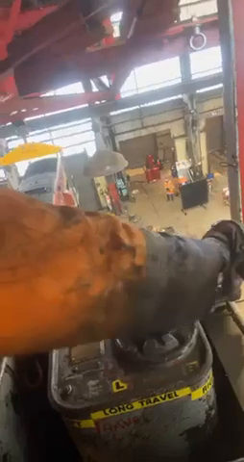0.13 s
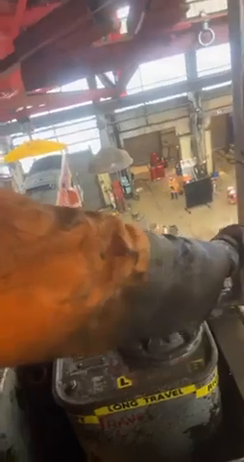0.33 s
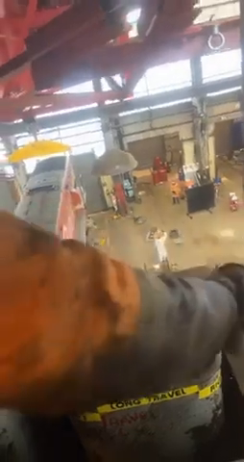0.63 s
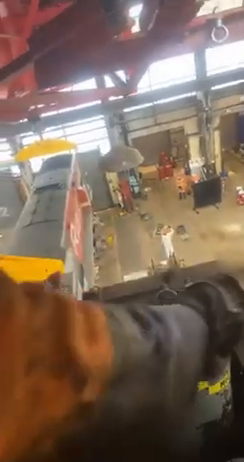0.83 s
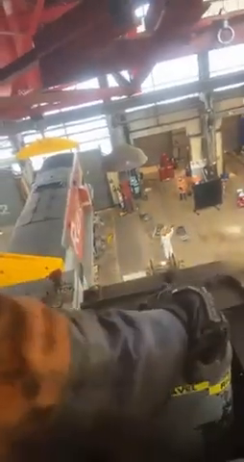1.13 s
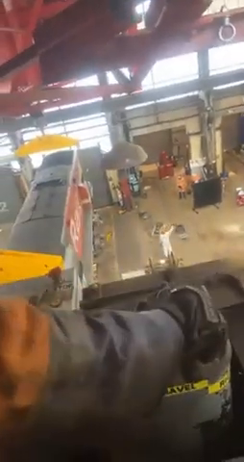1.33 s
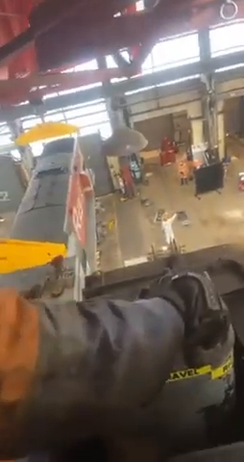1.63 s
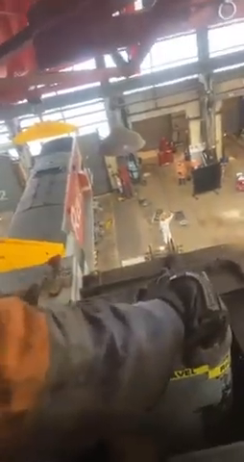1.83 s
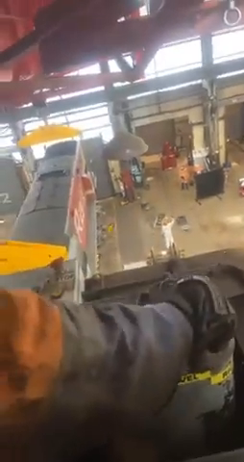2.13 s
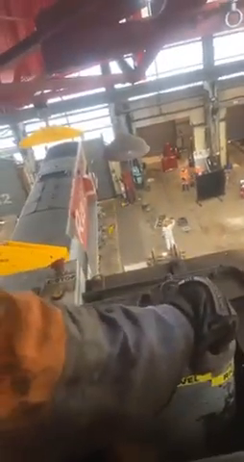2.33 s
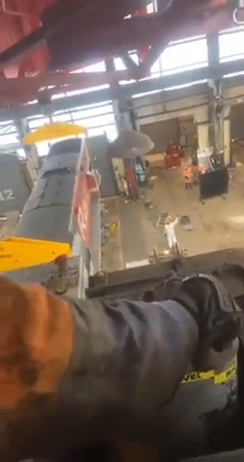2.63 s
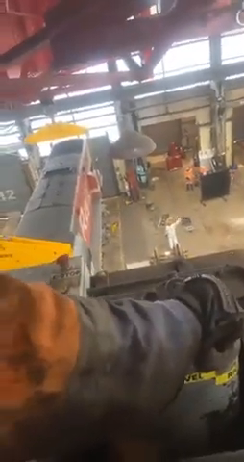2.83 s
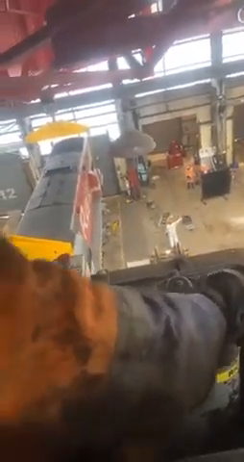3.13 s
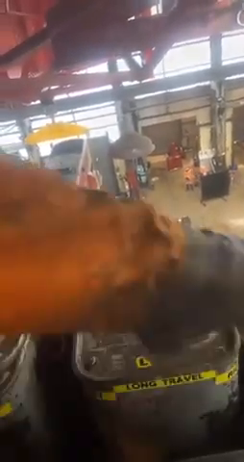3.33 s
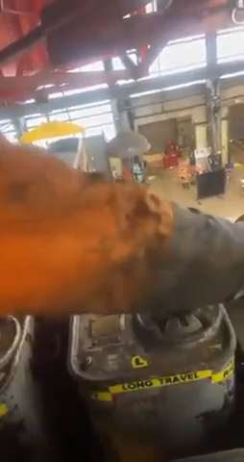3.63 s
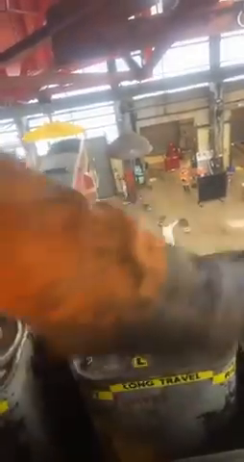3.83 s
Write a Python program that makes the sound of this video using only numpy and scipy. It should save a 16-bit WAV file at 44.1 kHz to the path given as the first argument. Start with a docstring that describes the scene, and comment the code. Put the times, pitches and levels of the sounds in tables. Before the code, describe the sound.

Overhead crane rumbles along its rails in a big workshop, controller clacking sharply through notches

```python
"""An overhead crane heard from its cab in a big steel workshop. Noise bands rumble, growl and hiss for the
wheels on the rails, and a wavering sine drones for the cab. The driver swings the travel controller through
notches that clack in modes and noise bursts; bumps, ticks and knocks fall between, and the hall answers the
controller. The noise sinks as the crane slows and a resonance whines. On the way back the controller shaft
groans in harmonics, it snaps into a notch and the drive picks up again."""
import sys
import numpy as np
from scipy import signal
from scipy.fft import rfft, irfft, next_fast_len
from scipy.io import wavfile
from scipy.ndimage import map_coordinates

SR = 44100
rng = np.random.default_rng(int(sys.argv[2]) if len(sys.argv) > 2 else 0)


def file_out(sig):
    """Save sig as 16-bit WAV at sys.argv[1]."""
    # one column per channel
    cols = np.atleast_2d(sig).T
    # limit, then scale
    lim = np.clip(cols, -1, 1)
    pcm = np.round(lim * 32767).astype(np.int16)
    wavfile.write(sys.argv[1], SR, pcm)


N = 176400


def amp(db):
    """Decibels to gain."""
    return 10 ** (np.asarray(db) / 20)


def unit(x):
    """Scale to rms 1."""
    return x / np.sqrt(np.mean(x ** 2) + 1e-20)


def along(points, hz):
    """Interpolate (Hz, value) points on a log frequency axis."""
    point_hz, values = np.transpose(points)
    return np.interp(np.log(hz + 1), np.log(point_hz + 1), values)


def curves(rows):
    """One value per sample for each column after the time."""
    times_s, *columns = np.transpose(rows)
    return [np.interp(np.arange(N) / SR, times_s, column) for column in columns]


def since(start_s):
    """Seconds elapsed after start_s, zero before."""
    return np.maximum(np.arange(N) / SR - start_s, 0)


def wobble(rate):
    """A smooth random curve, rate knots a second."""
    return map_coordinates(rng.standard_normal(8192), [np.arange(N) * rate / SR], mode="wrap")


def filtered(x, response):
    """Multiply the spectrum of x by a response of frequency."""
    m = next_fast_len(N + SR // 2)
    return irfft(rfft(x, m) * response(np.fft.rfftfreq(m, 1 / SR)), m)[:N]


def noise(spectrum):
    """Coloured noise of rms 1."""
    return unit(filtered(rng.standard_normal(N), lambda hz: amp(along(spectrum, hz))))


def band(centre_hz, half_width_hz):
    """Noise of rms 1 in one resonance, gain halved at half_width_hz off centre."""
    return unit(filtered(rng.standard_normal(N), lambda hz: 1 / (1 + ((hz - centre_hz) / half_width_hz) ** 2)))


def tone(hz):
    """A sine of rms 1 on a pitch curve."""
    return np.sqrt(2) * np.sin(2 * np.pi * np.cumsum(hz) / SR)


def envelope(t, attack_s, hold_s, t60_s):
    """Exponential attack; after the hold, a release of 60 dB per t60."""
    return (1 - np.exp(-t / attack_s)) * amp(-60 * np.maximum(t - hold_s, 0) / t60_s)


def travel():
    """The bridge rumbles, the wheels growl and hiss on the rails, a cab panel drones along."""
    # Levels of rumble, growl and hiss. Each row: time in seconds, level in dB.
    rumble_level = [(0, -26), (.13, -22.5), (.46, -23.5), (.75, -19), (1.31, -27.5), (1.6, -28.5),
                    (2.13, -31.5), (2.42, -33.5), (3.13, -37.5), (3.45, -33), (3.64, -26.5), (3.75, -36),
                    (4, -21.5)]
    growl_level = [(0, -23.5), (.25, -25.5), (.4, -23), (.6, -22), (.72, -23.5), (.82, -23), (1.07, -25),
                   (1.2, -26), (1.36, -31), (1.52, -30.5), (1.6, -34.5), (1.66, -30), (1.85, -35.5),
                   (1.94, -30.5), (2.03, -34.5), (2.17, -37.5), (2.28, -34.5), (2.37, -37.5), (2.45, -36),
                   (2.58, -39), (3.1, -39), (3.21, -33), (3.45, -34.5), (3.56, -25.5), (3.68, -34),
                   (3.78, -23.5), (3.84, -29.5), (3.96, -23), (4, -24)]
    hiss_level = [(0, -48.5), (.13, -42.5), (.3, -47), (.52, -39.5), (.61, -48.5), (.7, -42), (.82, -44),
                  (1.04, -50.5), (1.16, -48), (1.22, -53), (1.29, -48), (1.38, -53), (1.49, -50),
                  (1.6, -58), (1.72, -50), (1.92, -60.5), (2.06, -54), (2.14, -60.5), (2.29, -60),
                  (2.4, -63.5), (2.8, -62.5), (3.48, -61.5), (3.62, -47), (3.69, -51), (3.87, -55),
                  (3.95, -42.5), (4, -51)]
    # Cab drone. Each row: time in seconds, pitch in Hz, level in dB.
    drone_course = [(0, 205, -28), (.04, 199, -17.5), (.13, 197, -17), (.19, 192, -25.5), (.3, 195, -24.5),
                    (.37, 202, -17.5), (.42, 213, -20.5), (.48, 197, -22), (.53, 194, -14.5),
                    (.58, 197, -30.5), (.64, 208, -23.5), (.72, 200, -26), (1.0, 203, -28),
                    (1.35, 197.2, -35.5), (2.3, 200.8, -40), (3, 200, -63), (3.8, 200, -39.5),
                    (4, 200, -30)]
    # Spectra of rumble, growl and hiss. Each row: frequency in Hz, relative density in dB per Hz.
    rumble_spectrum = [(20, -16.5), (32, -13.5), (45, -6.5), (65, 1), (80, -4), (105, -0.5), (135, -4.5),
                       (180, -12), (300, -45.5), (600, -86)]
    growl_spectrum = [(60, -37.5), (130, -9), (175, 2), (205, -1.5), (225, 1.5), (280, -1), (310, -4.5),
                      (360, -7.5), (400, -10), (440, -8.5), (520, -14), (680, -17.5), (850, -22.5),
                      (1100, -26.5), (1600, -29.5), (2300, -35.5), (3500, -54), (6000, -100)]
    hiss_spectrum = [(700, -4), (1600, -4), (2600, 2.5), (4200, 3.5), (6500, 0), (8200, -4.5),
                     (9300, -27.5)]

    rumble_db, = curves(rumble_level)
    growl_db, = curves(growl_level)
    hiss_db, = curves(hiss_level)
    drone_hz, drone_db = curves(drone_course)
    rumble = amp(rumble_db + 0.72 * wobble(14)) * noise(rumble_spectrum)
    growl = amp(growl_db + 1.1 * wobble(30.23)) * noise(growl_spectrum)
    hiss = amp(hiss_db + 0.8 * wobble(25)) * noise(hiss_spectrum)
    wavering_hz = drone_hz * (1 + 0.02 * wobble(45))
    drone = amp(drone_db + 1.4 * wobble(38)) * tone(wavering_hz)
    return rumble + growl + hiss + drone


def thump(t):
    """The controller's stand rocks in one low mode."""
    mode_hz, rise_s, hold_s, t60_s = 252.3, 0.0032, 0.0079, 0.12
    return envelope(t, rise_s, hold_s, t60_s) * np.sin(2 * np.pi * mode_hz * t)


def clacks():
    """Each clack: a crack of the contacts, the ring of the steel case, a thump of its stand, a brief rattle."""
    # Controller clacks, with second contacts and rebounds. Each row: start in seconds, level in dB,
    # attack in seconds, then relative levels of thump, ring and crack in dB.
    strikes = [(.330, -16, 0.00042, 0.5, -1, -1), (0.341, -25, 0.00046, -16, 1.5, -6),
               (0.423, -25.5, 0.0058, 5.5, -1, 4.5), (0.924, -21, 0.0094, -9.5, 0, -2.5),
               (1.095, -27, 0.016, 4.5, 2.5, -0.5), (3.708, -13, 0.00023, 4, 2.5, -1),
               (3.759, -29.5, 0.009, 12, -10, 2)]
    # Case modes. Each row: frequency in Hz, relative level in dB, t60 in seconds.
    case_modes = [(359, -0.5, 0.16), (419, -3.5, 0.095), (605, -7.5, 0.18), (796, -6, 0.084),
                  (940, -8.5, 0.17), (1000, -7.5, 0.26), (1132, -1.5, 0.12), (1371, -1, 0.13),
                  (1520, -3.5, 0.1), (1580, 2.5, 0.105), (1667, 0.5, 0.1), (1875, -8.5, 0.12),
                  (3056, -15, 0.11), (3500, -7, 0.088), (3650, -4, 0.085), (3990, -7.5, 0.14),
                  (4580, -11.5, 0.091), (5310, 1, 0.039), (6000, -11.5, .09), (6480, -16, 0.12),
                  (7000, -6.5, 0.058)]
    # Contact crack and loose-part rattle. Each row: frequency in Hz, relative density in dB per Hz.
    crack_spectrum = [(300, -8), (900, -10), (1700, 1), (2300, -12.5), (3000, -2.5), (4000, -1), (5500, -2),
                      (7000, -5), (8500, -12), (9500, -25.5)]
    rattle_spectrum = [(150, -14.5), (250, 14.5), (400, 10.5), (600, -6), (1050, 0.5), (1700, -2.5),
                       (2300, -19.5), (4000, -17), (9000, -45)]
    crack_hold_s, crack_t60_s = 0.0036, 0.097
    rattle_db, rattle_attack_s, rattle_hold_s, rattle_t60_s = -15.5, 0.008, 0.051, 0.14

    out = np.zeros(N + SR)
    t = np.arange(SR // 2) / SR
    for start_s, db, attack_s, thump_db, ring_db, crack_db in strikes:
        ring = np.zeros(len(t))
        for hz, mode_db, t60_s in case_modes:
            mode_gain = amp(mode_db + rng.normal(0, 1.0))  # every strike excites the modes a little differently
            mode = np.sin(2 * np.pi * (hz * t + rng.random()))
            ring += mode_gain * envelope(t, attack_s, 0, t60_s) * mode
        crack = envelope(t, attack_s, crack_hold_s, crack_t60_s) * noise(crack_spectrum)[:len(t)]
        rattle = envelope(t, rattle_attack_s, rattle_hold_s, rattle_t60_s) * noise(rattle_spectrum)[:len(t)]
        clack = amp(rattle_db) * rattle
        clack += 1.2 * amp(thump_db) * thump(t)
        clack += 0.38 * amp(ring_db) * ring
        clack += 0.74 * amp(crack_db) * crack
        out[round(start_s * SR):][:len(t)] += amp(db) * clack
    return out[:N]


def wheels():
    """A low swell of the drone, then dull wheel bumps, all wavering sines; the gears whine while coasting."""
    # Wheel bumps, and first a low swell of the drone near 280 Hz.
    # Each row: start in seconds, pitch in Hz, level in dB, t60 in seconds.
    low_tones = [(.385, 279.5, -20, 0.51), (.7, 113, -14.5, 0.21), (1.641, 200.2, -16, 0.12),
                 (1.68, 85.25, -22.5, 0.36), (2.264, 204.2, -26, 0.33), (2.43, 85, -21, 0.14),
                 (2.73, 93.6, -29, 0.16), (3.466, 114.4, -24, 0.21)]
    # Gear whine. Each row: time in seconds, level in dB.
    whine_level = [(1.2, -76), (1.45, -43), (1.7, -45), (1.85, -51), (2.0, -43), (2.15, -48.5), (2.5, -57),
                   (3.06, -60), (3.15, -45.5), (3.3, -60)]

    bumps = np.zeros(N)
    for start_s, hz, db, t60_s in low_tones:
        wavering_hz = hz * (1 + 0.09 * wobble(90))
        bumps += amp(db) * envelope(since(start_s), 0.0056, 0, t60_s) * tone(wavering_hz)
    whine_db, = curves(whine_level)
    whine = amp(whine_db) * band(centre_hz=446, half_width_hz=19)
    return whine + bumps


def ticks():
    """Loose linkage parts sound in noise bursts, one resonance each, from short ticks to a long faint squeal."""
    # Each row: start in seconds, pitch in Hz, half width in Hz, level in dB, attack in seconds, t60 in seconds.
    bursts = [(.43, 1490, 220, -29, .004, 0.14), (0.664, 2110, 310, -33.5, .012, .22),
              (.912, 7530, 400, -31.5, 0.0053, 0.094), (1.07, 2250, 550, -38, .02, 0.51),
              (2.235, 2250, 300.7, -51, 0.005, 0.22), (3.0, 1314, 6.7, -54.5, 0.065, 1.3),
              (3.234, 1980, 800, -32, .006, 0.15), (3.635, 2190, 330, -34.5, 0.0007, 0.049),
              (3.895, 2280, 450, -36.5, 0.021, 0.48), (3.985, 7470, 79, -25, 0.0074, 0.46)]
    out = np.zeros(N)
    for start_s, hz, half_width_hz, db, attack_s, t60_s in bursts:
        out += amp(db) * envelope(since(start_s), attack_s, 0, t60_s) * band(hz, half_width_hz)
    return out


def knocks():
    """The lever knocks against its stop and rebounds: dull, gritty noise hits, with the stand's low mode."""
    # Lever knocks. Each row: start in seconds, level in dB, hold in seconds, t60 in seconds, thump level in dB.
    hits = [(0.609, -30.5, .012, .03, -43), (0.627, -31, .004, 0.12, -38), (3.523, -34, .018, 0.13, -15)]
    # Knock spectrum. Each row: frequency in Hz, relative density in dB per Hz.
    knock_spectrum = [(100, -19.5), (500, -20), (1100, -8), (1520, 3), (1930, -6), (2200, -20.5),
                      (3000, -12.5), (4200, -25.5), (8000, -40)]
    grit_db, stand_lag_s = 2, 0.0145

    out = np.zeros(N)
    for start_s, db, hold_s, t60_s, thump_db in hits:
        grit = amp(grit_db * wobble(400))
        out += amp(db) * envelope(since(start_s), 0.00082, hold_s, t60_s) * grit * noise(knock_spectrum)
        out += amp(thump_db) * thump(since(start_s + stand_lag_s))
    return out


def groan():
    """The shaft hums, then groans and scrapes: a rough buzz of overtones over a sagging, longer fundamental."""
    # Hum harmonics from the first up: relative level in dB.
    hum_partials = [0, -18, -23.5]
    # Groan harmonics from the second up: level in dB relative to the first.
    groan_partials = [-13, -19, -22, -27, -37, -32]
    # Scrape spectrum. Each row: frequency in Hz, relative density in dB per Hz.
    scrape_spectrum = [(120, -8), (350, 5), (700, 5), (1100, -5.5), (1700, 1.5), (2700, -6.5), (4500, -6),
                       (7000, -10.5), (9000, -23)]
    hum_start_s, hum_db, hum_hold_s = 3.185, -26, 0.18
    groan_start_s, pitch_hz, groan_db, groan_t60_s = 3.238, 293.6, -13.5, 0.11
    bend_share, bend_s, sag_share_per_s, jitter_share = 0.07, 0.009, 0.16, 0.018
    buzz_rise_s, buzz_hold_s, shimmer_db = 0.016, 0.056, 2.6
    swell_lag_s, swell_rise_s, swell_hold_s = 0.011, 0.02, 0.072

    hum_hz = pitch_hz * (1 + 0.025 * wobble(50))
    hum = sum(amp(db + 1.7 * wobble(45)) * tone(k * hum_hz) for k, db in enumerate(hum_partials, 1))
    hum *= amp(hum_db) * envelope(since(hum_start_s), 0.016, hum_hold_s, 0.06)

    t = since(groan_start_s)
    bend = bend_share * np.exp(-t / bend_s)  # starts high and settles
    sag = sag_share_per_s * np.minimum(t, 0.1)
    hz = pitch_hz * (1 + bend - sag + jitter_share * wobble(260))

    swell = np.minimum(since(groan_start_s + swell_lag_s) / swell_rise_s, 1)
    fundamental = swell * envelope(t, 0.0023, swell_hold_s, groan_t60_s) * tone(hz)
    overtones = sum(amp(db + shimmer_db * wobble(200)) * tone(k * hz)
                    for k, db in enumerate(groan_partials, 2))
    buzz = envelope(t, buzz_rise_s, buzz_hold_s, groan_t60_s) * overtones
    scrape = envelope(t, 0.02, 0.048, 0.18) * noise(scrape_spectrum)
    scrape *= 1 + 0.17 * tone(hz)  # roughened at the groan's pitch
    return amp(groan_db) * (fundamental + buzz + amp(-14.0) * scrape) + hum


def hall(x):
    """A diffuse tail, decaying at its own rate per frequency, and one smeared echo from the far wall."""
    # Hall decay. Each row: frequency in Hz, t60 in seconds.
    decay = [(100, 0.65), (1000, 0.68), (4000, 0.45), (9000, 0.44)]
    tail_db, echo_db, echo_s, echo_spread_s = -20, -19, 0.076, 0.01

    hz, frame_s, spectrum = signal.stft(rng.standard_normal(SR), SR, nperseg=256)
    decaying = spectrum * amp(-60 * frame_s / along(decay, hz)[:, None])
    tail = signal.istft(decaying, SR, nperseg=256)[1][:SR]
    lag = (np.arange(SR) / SR - echo_s) / echo_spread_s
    echo = rng.standard_normal(SR) * np.exp(-0.5 * lag ** 2)
    # tail and echo are each scaled to unit energy before their level
    response = amp(tail_db) * tail / np.linalg.norm(tail)
    response += amp(echo_db) * echo / np.linalg.norm(echo)
    return signal.fftconvolve(x, response)[:N]


def scene():
    """The controller close by, the hall's answer to it and the travelling crane."""
    controller = clacks() + knocks() + ticks() + groan()
    return (controller + hall(controller) + travel() + wheels())[None]


def record(dry):
    """The microphone's band limit: a very steep low-pass, 3 dB down at top_hz."""
    top_hz = 9350
    return filtered(dry[0], lambda hz: 1 / np.sqrt(1 + (hz / top_hz) ** 160))[None]


dry = scene()
out = record(dry)
file_out(out)
```